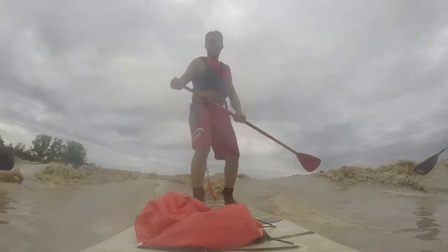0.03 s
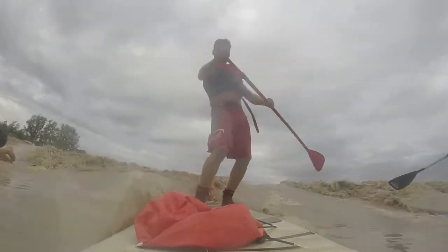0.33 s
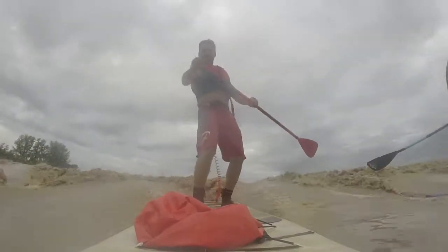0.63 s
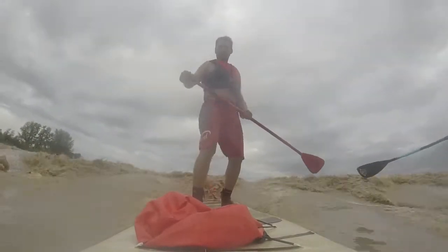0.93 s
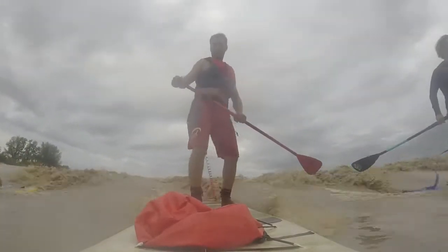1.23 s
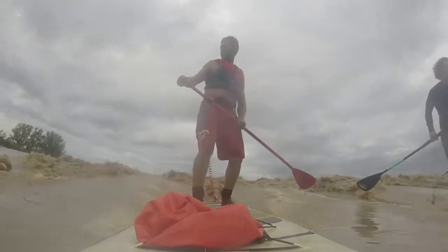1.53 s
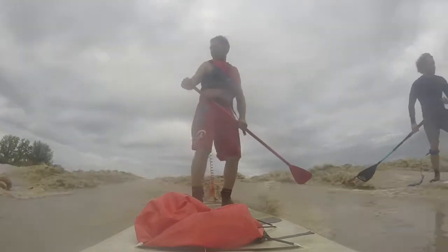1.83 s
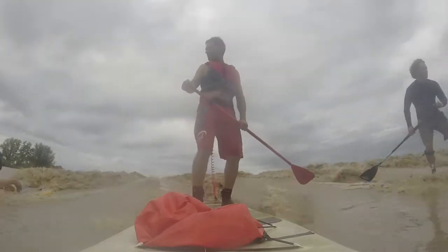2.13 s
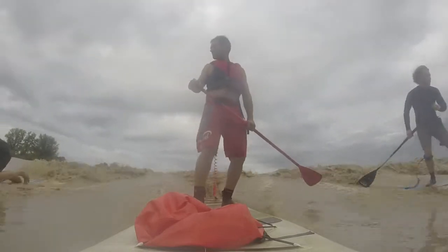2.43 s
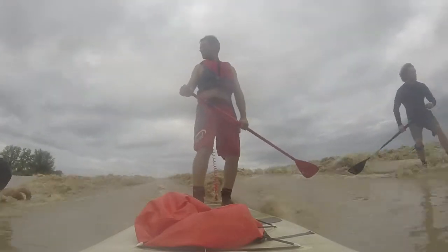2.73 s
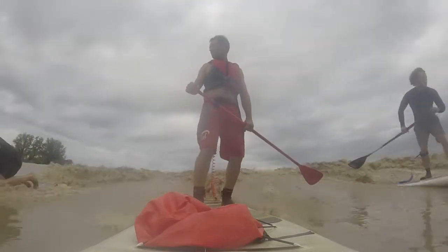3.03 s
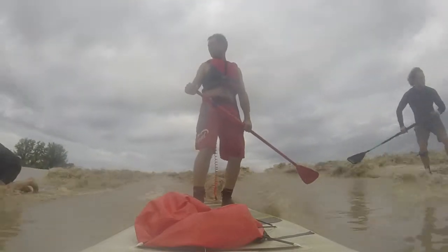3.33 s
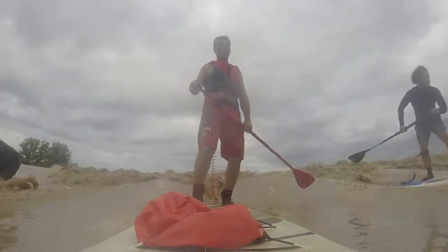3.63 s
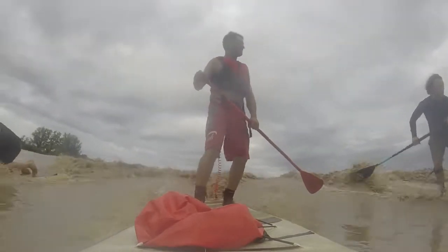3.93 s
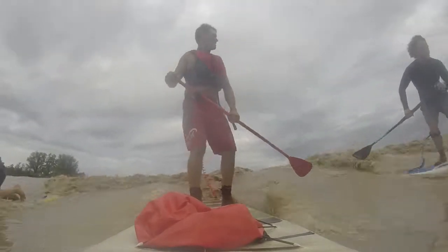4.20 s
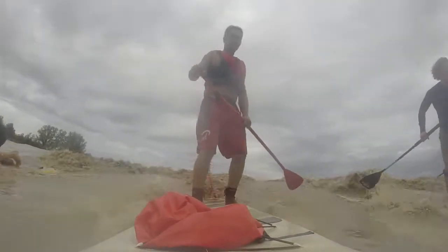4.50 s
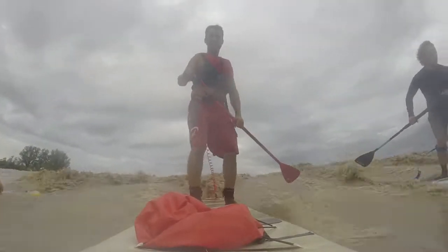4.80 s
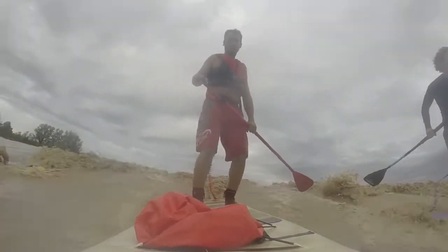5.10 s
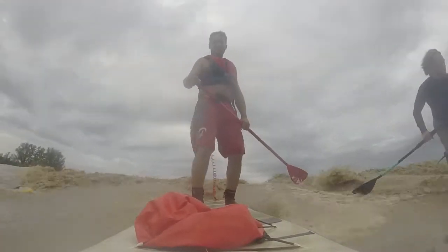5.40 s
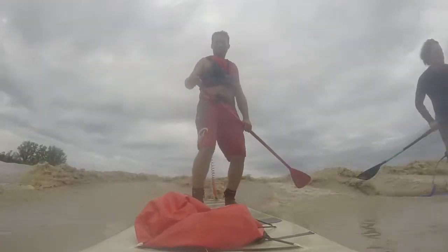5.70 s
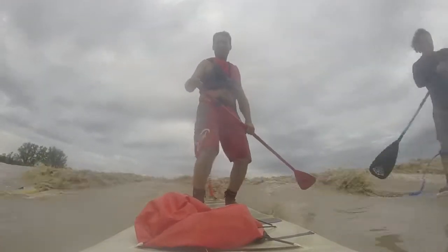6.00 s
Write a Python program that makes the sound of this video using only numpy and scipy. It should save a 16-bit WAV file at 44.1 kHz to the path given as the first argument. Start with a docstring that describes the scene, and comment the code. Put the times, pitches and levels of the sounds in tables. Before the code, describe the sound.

Waves slap and boom against a paddle board's hull as wind buffets, water gurgles, spray patters and a rapid hisses further off.

```python
"""A hollow paddle board drums in the chop and wind of a fast river, heard from a camera on its nose.
Water gurgles at the bow as it traps air, and throws spray on the camera's waterproof case.
Behind it hiss the countless bursting bubbles of a rapid. Waves thump the hull, sheets of water slide
past, the mount clicks and foam fizzes. The camera's limiter turns everything down after heavy blows."""
import sys
import numpy as np
from scipy import signal
from scipy.fft import rfft, irfft
from scipy.io import wavfile
from scipy.ndimage import uniform_filter1d, minimum_filter1d

SR = 44100
rng = np.random.default_rng(int(sys.argv[2]) if len(sys.argv) > 2 else 0)


def digitize_waveform(pressure):
    """Quantize a signal to 16-bit integers and store it at the path in sys.argv[1].

    Rows of a 2-D input are taken as channels; values are limited to [-1, 1].
    """
    field = np.atleast_2d(pressure).T
    bounded = np.clip(field, -1, 1)
    quanta = np.round(bounded * 32767).astype(np.int16)
    wavfile.write(sys.argv[1], SR, quanta)


N = 271215
T = np.arange(N) / SR


def undb(db):
    """Turn decibels into a number to multiply by."""
    return 10 ** (np.asarray(db) / 20)


def unit(x):
    """Scale to an average strength (rms) of 1."""
    return x / np.sqrt(np.mean(x ** 2))


def level_curve(table):
    """Join (t/s, level/dB) points into a smooth volume curve."""
    times, db = np.transpose(table)
    return undb(np.interp(T, times, db))


def colour(x, points):
    """Shape the tone with (f/Hz, level/dB) points, falling steeply beyond both ends; rms 1."""
    hz, db = np.transpose(points)
    bins = np.maximum(np.arange(N // 2 + 1) * SR / N, 1)
    shape = undb(np.interp(np.log(bins), np.log(hz), db))
    edges = np.minimum(1, np.minimum(bins / hz[0], hz[-1] / bins)) ** 4
    return unit(irfft(rfft(x) * shape * edges, N))


def wander(rate):
    """A random curve that changes course about rate times a second; rms 1."""
    steps = rng.standard_normal(4096)
    return unit(np.interp(T * rate, np.arange(len(steps)), steps))


def even(x, span_s):
    """Take out swells slower than span_s, keeping the quick flutter."""
    size = max(int(span_s * SR), 2)
    return x / np.sqrt(uniform_filter1d(uniform_filter1d(x ** 2, size), size) + 1e-9)


def swell(s, rise_s, fall_s):
    """A bell-shaped curve that rises to 1 at time s and falls again."""
    width_s = np.where(T < s, rise_s, fall_s)
    return np.exp(-np.minimum(((T - s) / width_s) ** 2, 50))


def add(out, s, sound):
    """Mix a sound in at time s."""
    start = max(int(s * SR), 0)
    out[start:start + len(sound)] += sound[:max(N - start, 0)]


def drops(rate, spread_db):
    """Tiny impacts of random strength, about rate of them a second; rms 1."""
    hits = rng.random(N) < rate / SR
    signs = np.sign(rng.standard_normal(N))
    strengths = undb(spread_db * np.minimum(rng.standard_normal(N), 2))
    return unit(hits * signs * strengths)


def bubble(hz, cycles, glide):
    """Trapped air rings for some cycles, its pitch rising as it nears the surface."""
    age = np.linspace(0, 1, int(cycles * SR / hz))
    tone = np.sin(2 * np.pi * cycles * age * (1 + glide * age / 2))
    return tone * np.exp(-np.log(100) * age) * (1 - np.exp(-2 * cycles * age))


def bubbles(low_hz, high_hz, cycles, spread_db, count):
    """A swarm of bubbles of random size at random moments; rms 1."""
    out = np.zeros(N)
    for when, pitch, strength in rng.random((count, 3)):
        hz = low_hz * (high_hz / low_hz) ** pitch
        add(out, when * N / SR, undb(spread_db * strength) * bubble(hz, cycles, glide=0.13))
    return unit(out)


# how rough the water is under the board: t/s, level/dB
CHOP = [(0, -3), (.4, -3.5), (.78, 0.5), (1.05, 0), (1.28, 2.5), (1.85, -0.5), (2.25, 0), (2.85, 1.1),
        (3.24, 1.6), (3.33, -6.5), (3.43, 2.5), (3.85, 2.5), (4.3, 0), (4.62, 0), (4.78, -5), (5.33, -6.5),
        (5.62, 2), (6.15, -2.5)]
# small waves slapping the bow: peak t/s, drumming level/dB, splash level/dB, rise time/s
LAPS = [(0.099, -10, -38.5, 0.022), (0.201, -11.5, -30.5, 0.064), (0.664, -11, -30, 0.037),
        (.845, -10, -37, 0.033), (.95, -11.5, -31.5, 0.036), (1.392, -13.5, -46, 0.036),
        (1.569, -10.5, -34, 0.034), (1.789, -11, -35.5, 0.026), (1.918, -12, -32.5, .018),
        (2.02, -10.5, -31, 0.018), (2.161, -14, -31.5, 0.083), (2.293, -11, -32, 0.043),
        (2.485, -11, -28.5, .025), (2.619, -27, -29.5, .035), (2.93, -13, -34, 0.067),
        (3.089, -16.5, -33.5, 0.028), (3.176, -27, -30, 0.016), (3.62, -15, -43, 0.039),
        (3.739, -20, -37, 0.091), (3.974, -12.5, -24.5, 0.032), (4.21, -13, -33, 0.029),
        (4.399, -9, -25.5, 0.043), (4.869, -11, -27, 0.04), (5.04, -14, -29.5, 0.031),
        (5.105, -18, -33, 0.025), (5.215, -16.5, -37, 0.018), (5.489, -14, -29, 0.068),
        (5.705, -12, -29.5, 0.041), (5.9, -11, -29, 0.022), (6.089, -12, -29.5, 0.027)]

def chop_and_laps():
    """Volume curves for drumming, gurgle and spray: they follow the chop and swell with each wave."""
    chop = level_curve(CHOP) * undb(1.52 * wander(rate=17))  # with small random ripples
    slap_power, splash_power = np.zeros(N), np.zeros(N)
    for s, drum_db, splash_db, rise_s in LAPS:
        lap = swell(s, rise_s, fall_s=1.06 * rise_s)
        slap_power += (undb(drum_db) * lap) ** 2
        splash_power += (undb(splash_db) * lap) ** 2
    splash = np.sqrt(splash_power)
    thrown = undb(-5) * np.interp(T + 0.005, T, splash)  # spray is weaker and flies a little earlier
    drumming = np.hypot(undb(-18.5) * chop, np.sqrt(slap_power))  # hypot adds two levels by their power
    gurgle = np.hypot(undb(-34.5) * chop, splash)
    spray = np.hypot(undb(-40) * chop, thrown)
    return drumming, gurgle, spray


# deep rumble of the board bending: f/Hz, level/dB
FLEX_TONE = [(10, -20), (20, -11.5), (30, 0.5), (39, -3.5), (45, -4), (53, -26.5), (75, -34.5)]
# boom of the hollow hull: f/Hz, level/dB
HULL_TONE = [(45, -37.5), (60, -19), (85, -5.5), (100, 1.5), (113, -0.5), (128, -3), (145, -8.5),
             (185, -10.5), (250, -23.5), (340, -37.5)]

def board(drumming):
    """Chop and wind shake the board: a deep rumble and a drumming hull, the loudest peaks rounded off."""
    flex = even(colour(rng.standard_normal(N), FLEX_TONE), span_s=0.13)
    buffeting = rng.standard_normal(N) * undb(2.25 * wander(45))
    hull = even(colour(buffeting, HULL_TONE), span_s=0.06)
    sound = undb(-21.5) * flex + drumming * hull
    ceiling = undb(-3.2)
    return sound / (1 + (sound / ceiling) ** 6) ** (1 / 6)


# churning water, heard inside the case: f/Hz, level/dB
GURGLE_TONE = [(170, 2), (270, -1.5), (390, -0.5), (480, -3.5), (600, -2.5), (700, -9), (900, -22),
               (1300, -39)]
# droplets landing on the case: f/Hz, level/dB
SPRAY_TONE = [(650, 0.5), (1000, -9.5), (1230, -4.5), (1400, 4), (1580, 2), (1780, -5.5), (2100, 1.5),
              (2400, -7), (2750, -11), (3080, -32), (3480, -19.5), (4000, -37.5), (6000, -35.5),
              (12000, -50)]

def bow_wave(gurgle, spray):
    """Water folds over at the bow in quick surges, trapping bubbles and throwing droplets on the case."""
    surge = wander(60)
    big_bubbles = bubbles(low_hz=255.4, high_hz=870, cycles=15.8, spread_db=5.5, count=700)
    churn = drops(rate=2500, spread_db=3.5) + undb(-17) * big_bubbles
    churn = colour(churn * undb(0.41 * surge), GURGLE_TONE)
    small_bubbles = bubbles(low_hz=1129, high_hz=2852, cycles=68, spread_db=20, count=700)
    splash = drops(rate=6000, spread_db=2.5) + undb(-19) * small_bubbles
    splash = colour(splash * undb(1.3 * surge + wander(210)), SPRAY_TONE)
    return gurgle * even(churn, span_s=0.042) + spray * even(splash, span_s=0.059)


# how loud the rapid is: t/s, level/dB
RAPID_LEVEL = [(0, -39.7), (.4, -43), (1.4, -39.5), (2.5, -40.5), (3.1, -40.5), (3.3, -39), (4.3, -41.5),
               (5.8, -41.5), (6.15, -40.5)]
# hiss of the rapid: f/Hz, level/dB
RAPID_TONE = [(500, 13), (1000, 3), (1500, 10.5), (2400, 9.5), (3080, -2), (3480, 4.5), (3900, -0.5),
              (4900, 0), (6400, -5), (7600, -11.5), (9300, -12.5), (11000, -22), (13400, -17.5),
              (15000, -32.5)]

def rapid():
    """White water further off: countless bursting bubbles merge into a hiss."""
    bursts = drops(rate=16000, spread_db=3) * undb(0.57 * wander(50))
    return level_curve(RAPID_LEVEL) * colour(bursts, RAPID_TONE)


# sharp spurts of spray: t/s, level/dB, fade time/s
SPURTS = [(0.152, -29, 0.027), (.572, -23, 0.0081), (0.623, -24.5, 0.0068), (.935, -28, 0.03),
          (2.408, -24.5, 0.014), (2.459, -31.5, 0.028), (2.598, -30, 0.04), (3.872, -27, 0.028),
          (3.963, -23, 0.0066), (4.826, -30, 0.023), (5.03, -27, 0.0049), (5.563, -27, 0.011),
          (5.733, -22, 0.0052), (5.864, -30, .025)]

def spurts():
    """A volume curve for extra spray: each spurt hits the case at once and patters out."""
    out, t = np.zeros(N), T[:SR // 5]
    for s, db, fade_s in SPURTS:
        add(out, s, undb(db) * np.exp(-t / fade_s) * (1 - np.exp(-t / 0.002)))
    return out


# sheets of water sliding over the nose: peak t/s, level/dB, rise time/s
SHEETS = [(.19, -39, 0.044), (4.4, -33.5, 0.052), (5.48, -42.5, 0.075)]
# hiss of a sliding sheet: f/Hz, level/dB
SHEET_TONE = [(900, -5), (1500, 3), (2400, 13), (3080, -7.5), (3500, 4), (4200, -4.5), (6200, -3),
              (7400, -19.5), (9300, -16), (12000, -31)]

def sheets():
    """A sheet of water builds up over the nose, hisses past the case and is gone."""
    level = sum(undb(db) * swell(s, rise_s, fall_s=0.022) for s, db, rise_s in SHEETS)
    hiss = colour(drops(rate=7300, spread_db=2.5), SHEET_TONE)
    return level * even(hiss, span_s=0.03)


# waves striking the hull: t/s, level/dB, f/Hz, rise time/s
THUMPS = [(0.244, -7.5, 132, 0.012), (0.388, -8, 30.8, 0.019), (0.446, -3, 86.2, 0.014),
          (0.5, 4.5, 36.2, 0.023), (0.601, -6, 37.4, 0.042), (0.659, 3, 107, 0.0079),
          (2.115, -6.5, 110.6, 0.024), (3.785, 2.5, 39.1, 0.023), (3.895, -1.5, 98, 0.0097),
          (3.955, -1, 38, 0.031), (4.038, -1.5, 37, 0.025), (4.125, -6, 35, 0.023), (4.361, -1, 40.4, .014),
          (4.396, -6.5, 122.2, 0.017), (4.428, 3.5, 34, 0.017), (4.873, -3, 39.1, 0.033),
          (5.019, -11, 41.2, 0.032), (5.495, -10, 111, 0.02), (5.744, -3, 32.5, 0.016),
          (5.901, -11, 35, 0.023)]

def thumps():
    """Each wave sets off one of the board's own low notes, which swells and dies away."""
    out, t = np.zeros(N), T[:SR // 2]
    for s, db, hz, rise_s in THUMPS:
        rise_and_fade = t / rise_s * np.exp(1 - t / rise_s)
        add(out, s, undb(db) * rise_and_fade * np.sin(2 * np.pi * hz * t))
    return out


# big air pockets collapsing under the bow: t/s, level/dB, f/Hz
GLUGS = [(0.248, -19.5, 324), (.388, -21.5, 380), (0.542, -18, 540), (.657, -12, 340), (2.587, -22, 290),
         (3.961, -14.5, 423), (4.412, -16, 435), (4.847, -20, 640), (4.883, -11, 543)]

def glugs():
    """Single large bubbles stand out of the gurgle, their loudness wobbling as they collapse."""
    out = np.zeros(N)
    for s, db, hz in GLUGS:
        add(out, s, undb(db) * bubble(hz, cycles=18, glide=0.046))
    return out * undb(3.5 * wander(190))


# clicks of the camera mount: t/s, level/dB
CLICKS = [(3.799, -7), (3.9756, -9), (4.013, -25), (4.05, -23)]
# notes that the mount and case ring with: f/Hz, relative level/dB, fade time/s (to fall by 60 dB)
MOUNT_NOTES = [(340, 14, 0.015), (590, 0, 0.02), (960, -10, 0.0065), (1340, -3, 0.014), (1880, -6, .009),
               (2360, -8, 0.015), (3500, 2.5, 0.011), (5970, -5.5, 0.0077), (8600, -13, 0.0043)]
# crack of the slipping joint: f/Hz, level/dB
CRACK_TONE = [(500, -4), (1400, 13), (2500, 7), (3700, -4), (4600, -3), (6200, -8), (7400, -19),
              (8700, -15), (11000, -36)]

def mount_clicks():
    """The jolted mount slips in its joint with a crack and rings the plastic case briefly."""
    out, t = np.zeros(N), T[:SR // 20]
    ring = np.zeros(len(t))
    for k, (hz, db, fade_s) in enumerate(MOUNT_NOTES):
        fade = np.exp(-np.log(1000) * t / fade_s)
        ring += (-1) ** k * undb(db) * np.sin(2 * np.pi * hz * t) * fade  # every other note is flipped
    ring *= 1 - np.exp(-t / 0.00056)  # soften the start
    ring /= np.abs(ring).max()
    grit = colour(rng.standard_normal(N), CRACK_TONE)
    for s, db in CLICKS:
        crack = grit[int(s * SR):][:len(t)] * np.exp(-t / 0.00071) * (1 - np.exp(-t / 0.0003))
        add(out, s, undb(db) * (ring + undb(1) * crack))
    return out


# patches of foam on the deck: peak t/s, level/dB, rise time/s, fall time/s
FOAM_PATCHES = [(4.94, -62, 0.1, .28), (5.49, -64, .15, .06)]
# high fizz of the foam: f/Hz, level/dB
FOAM_TONE = [(7000, -18), (8400, 5), (9700, 1), (10500, -17), (13300, -11), (14500, -22.5)]

def foam():
    """The finest bubbles burst right next to the case."""
    level = sum(undb(db) * swell(s, rise_s, fall_s) for s, db, rise_s, fall_s in FOAM_PATCHES)
    return level * colour(drops(rate=7000, spread_db=3), FOAM_TONE)


def scene():
    """The board, the mount and the water all reach one microphone."""
    drumming, gurgle, spray = chop_and_laps()
    solid = board(drumming) + thumps() + mount_clicks()
    water = bow_wave(gurgle, np.hypot(spray, spurts())) + glugs() + sheets() + foam() + rapid()
    return (solid + water)[None]


def limiter(x, ceiling_db, hold_s, release_db_per_s):
    """Turn down at once for a peak over the ceiling, hold, then come back up slowly."""
    over_db = np.maximum(20 * np.log10(np.abs(x) + 1e-9) - ceiling_db, 0)
    half_hold = int(hold_s * SR / 2)
    held_db = -minimum_filter1d(-over_db, 2 * half_hold + 1, origin=half_hold)  # largest recent excess
    cut_db = np.maximum.accumulate(held_db + release_db_per_s * T) - release_db_per_s * T
    smooth_gain_db = uniform_filter1d(minimum_filter1d(-cut_db, size=129), size=129)
    return x * undb(smooth_gain_db)


def record(dry):
    """The camera holds down the peaks and cuts the highest treble."""
    limited = limiter(dry[0], ceiling_db=-1.84, hold_s=0.16, release_db_per_s=11.5)
    treble_cut = signal.ellip(8, 0.2, 70, 15200, fs=SR, output="sos")  # above 15200 Hz
    return signal.sosfilt(treble_cut, limited)[None]


dry = scene()
out = record(dry)
digitize_waveform(out)
```